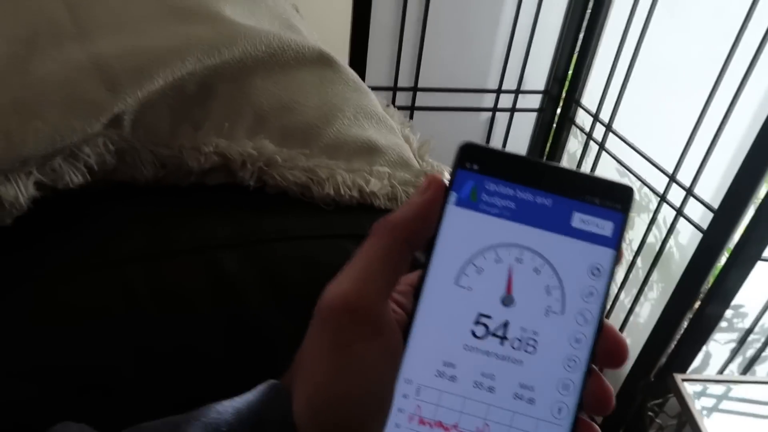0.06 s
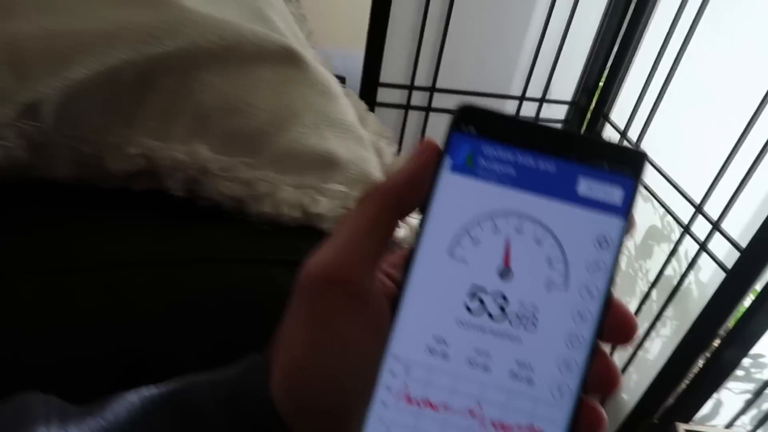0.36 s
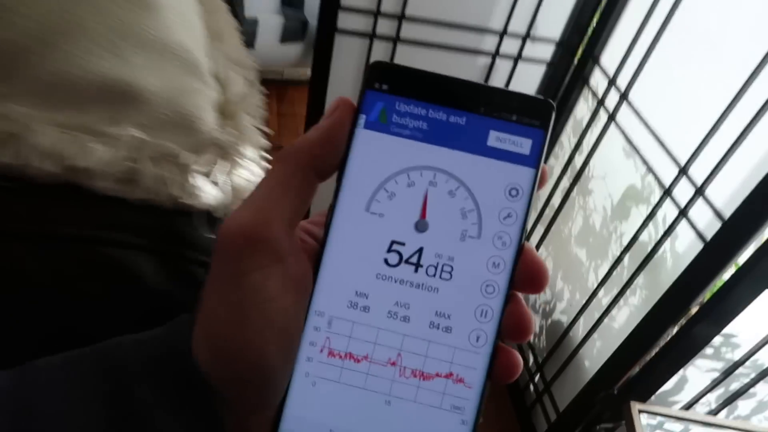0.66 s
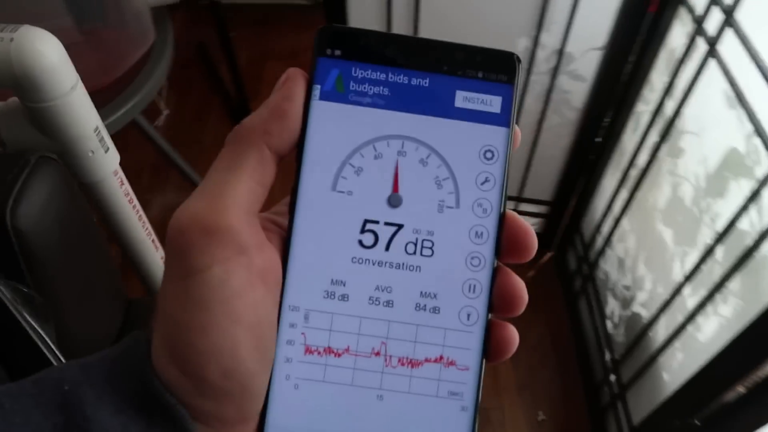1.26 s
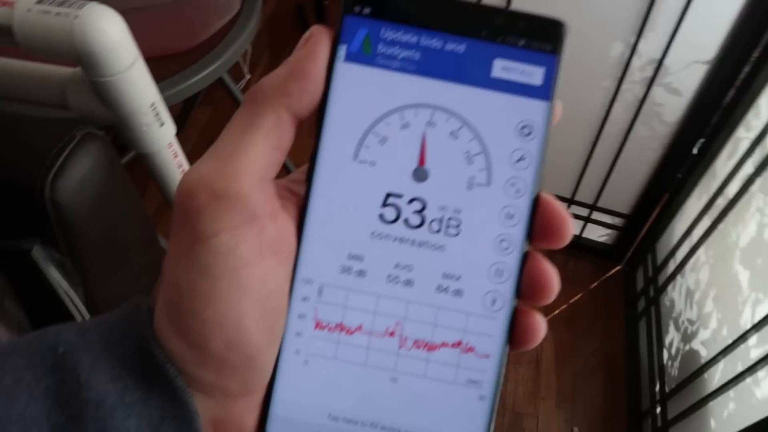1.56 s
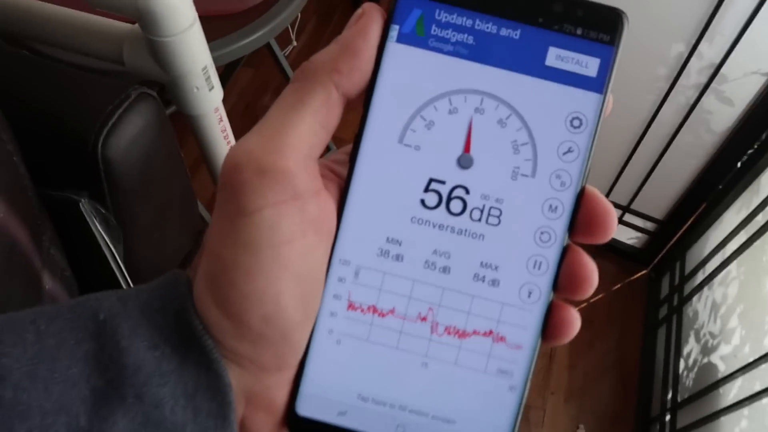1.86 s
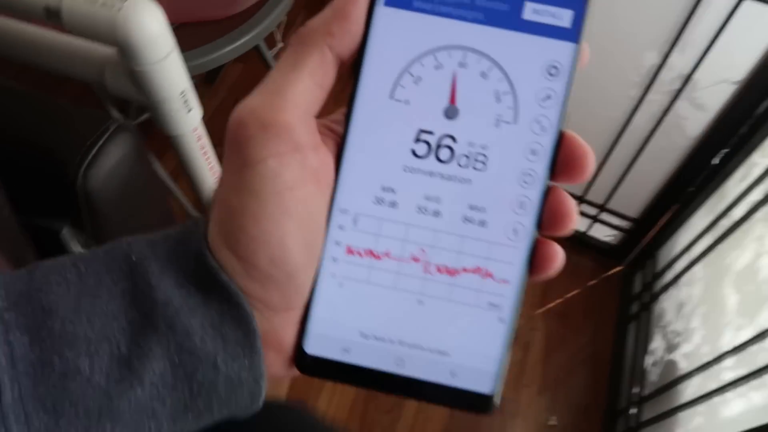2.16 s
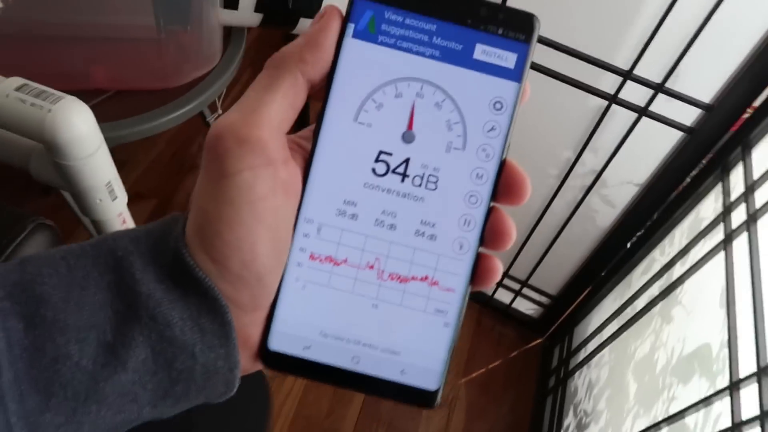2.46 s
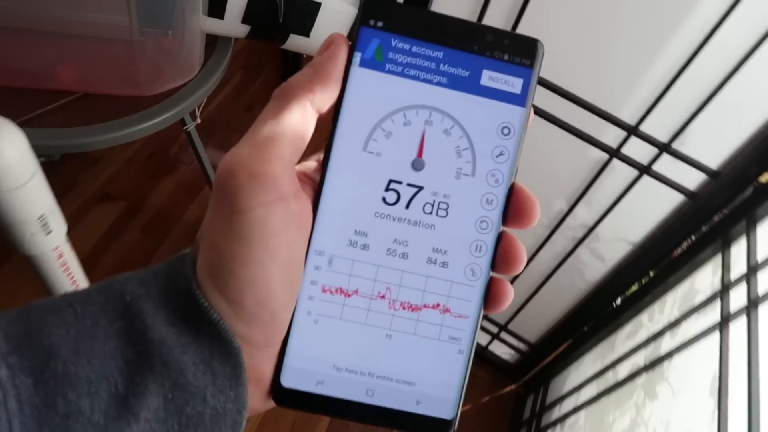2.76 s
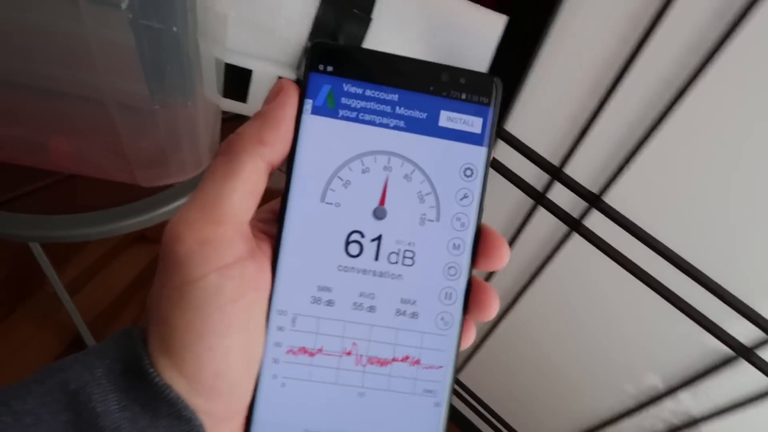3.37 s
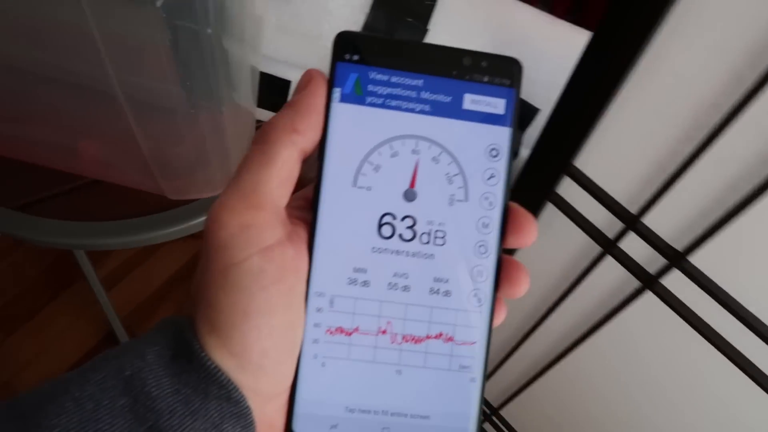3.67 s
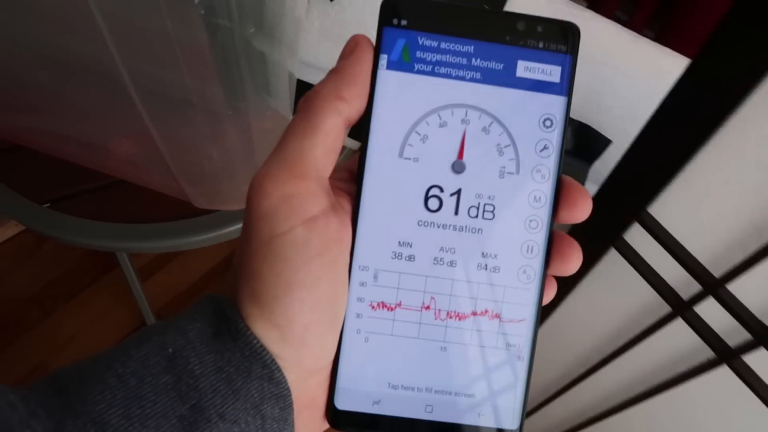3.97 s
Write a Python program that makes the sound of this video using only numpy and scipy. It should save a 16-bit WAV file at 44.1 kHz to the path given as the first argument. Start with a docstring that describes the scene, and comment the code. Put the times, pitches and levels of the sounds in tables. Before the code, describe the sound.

A high, steady whine of cooling fans fills a room, with an airy rush and low electrical hum beneath. A hand or sleeve lightly brushes the moving microphone twice and bumps it softly in between.

```python
"""A high, steady whine from a machine's cooling fans, over a rush of air and a low electrical hum.
Each fan sings at its blade rate. A hand-held microphone drifts through the room's standing waves,
so each tone swells and fades on its own. A hand or sleeve brushes the microphone twice, and between
the brushes the hand bumps it softly: one thud with two weaker knocks close behind."""
import sys
import numpy as np
from scipy import signal
from scipy.fft import rfft, irfft, next_fast_len
from scipy.io import wavfile
from scipy.ndimage import uniform_filter1d, map_coordinates

SR = 44100
rng = np.random.default_rng(int(sys.argv[2]) if len(sys.argv) > 2 else 0)


def inscribe(sig):
    """Save sig as 16-bit PCM at rate SR to the path in sys.argv[1].

    A 1-D sig is mono; a 2-D sig holds one channel per row.
    Samples are clipped to [-1, 1] before scaling.
    """
    pcm = np.round(np.clip(np.atleast_2d(sig).T, -1, 1) * 32767)
    wavfile.write(sys.argv[1], SR, pcm.astype(np.int16))


N = 176400
TIME_S = np.arange(N) / SR


def amp(db):
    """Decibels to gain."""
    return 10 ** (np.asarray(db) / 20)


def unit_rms(x):
    """Scale to rms 1."""
    return x / np.sqrt(np.mean(x ** 2) + 1e-20)


def eq_gain(points, hz):
    """Gain of an EQ curve drawn through (freq_hz, gain_db) points on a log frequency axis."""
    freq_hz, gain_db = np.transpose(points)
    return amp(np.interp(np.log(hz + 1), np.log(freq_hz + 1), gain_db))


def envelopes(rows):
    """One breakpoint envelope for each column after the time."""
    time_s, *columns = np.transpose(rows)
    return [np.interp(TIME_S, time_s, column) for column in columns]


def wobble(rate_hz):
    """A smooth random modulator, with rate_hz new values a second."""
    return map_coordinates(rng.standard_normal(4096), [TIME_S * rate_hz], mode="wrap")


def filtered(x, response):
    """Shape x with a gain that depends on frequency."""
    size = next_fast_len(N + SR // 2)
    return irfft(rfft(x, size) * response(np.fft.rfftfreq(size, 1 / SR)), size)[..., :N]


def drifting_phase(pitch_hz, drift_hz):
    """Phase of a pitch that wanders slightly."""
    return 2 * np.pi * (np.cumsum(pitch_hz + drift_hz * wobble(3.003)) / SR + rng.random())


def blade_tone(phase, level_db, flutter, side_db):
    """A tone with a share (flutter) shaken by turbulence; reflections make left and right differ."""
    shake = 1 + flutter * (wobble(45) + 1j * wobble(45))
    side = amp(side_db) * (wobble(2.27) + 1j * wobble(2.2)) / np.sqrt(2)
    stereo = np.array([1 + side, 1 - side])
    return np.sqrt(2) * amp(level_db) * np.real(shake * np.exp(1j * phase) * stereo)


# The whine's swells and fades: time_s, level_db
WHINE_LEVEL = [(0,-22),(.3,-21),(.46,-25.5),(.58,-35),(.61,-31),(.655,-33),(.685,-25.5),(.75,-23.7),(.98,-26),(1.1,-23.3),(1.35,-26.5),(1.49,-21.7),(1.9,-23),(2.21,-20.1),(2.38,-24.3),(2.54,-23),(2.89,-25.6),(2.97,-22.6),(3.17,-23.3),(3.28,-31),(3.38,-27.3),(3.47,-28),(3.66,-23.4),(3.92,-21.8),(4,-22.4)]
# Its sway as the microphone drifts: time_s, left_minus_right_db
WHINE_PAN = [(0,-1),(.25,0),(.54,-2),(.63,4.2),(.75,.3),(1.02,0),(1.35,4.5),(1.5,1.1),(2.68,-.2),(2.82,1.9),(3.0,.5),(3.26,0),(3.38,-2.2),(4,-1.2)]

def whining_fan():
    """The loudest fan: one nearly pure tone that wavers slightly and sways between the channels."""
    level_db, = envelopes(WHINE_LEVEL)
    pan_db, = envelopes(WHINE_PAN)
    phase = drifting_phase(pitch_hz=1110.2, drift_hz=1.2)
    return blade_tone(phase, level_db, flutter=.085, side_db=-32) * amp([pan_db / 2, -pan_db / 2])


# Swells of the singing fan's first three harmonics, a table each: time_s, level_db
SINGER_FIRST = [(0,-44),(.1,-33),(.2,-35),(.28,-29.7),(.7,-32),(.86,-50),(.93,-49),(1.02,-42.5),(1.13,-43),(1.45,-28.8),(1.7,-28.3),(1.9,-31),(2.4,-30.7),(2.8,-36.5),(3.14,-34.5),(3.24,-43),(3.6,-31),(3.7,-33),(3.85,-29.5),(4,-32)]
SINGER_SECOND = [(0,-53),(.15,-42),(.3,-48),(.54,-39),(.7,-51),(.8,-45),(1.15,-48.5),(1.34,-38.5),(1.52,-41),(1.9,-34.5),(2.25,-34),(2.42,-39),(2.49,-50),(2.59,-42.5),(2.67,-46),(2.85,-38),(3.12,-39),(3.3,-46),(3.52,-35),(3.77,-35.5),(4,-48)]
SINGER_THIRD = [(0,-62),(.25,-58),(.4,-48),(.74,-44),(.83,-56),(1.16,-58),(1.24,-39.5),(1.42,-43),(1.63,-36.8),(1.8,-42),(2.1,-39.7),(2.27,-48),(2.34,-60),(2.41,-43),(2.49,-39),(2.75,-48),(3.12,-43),(3.4,-58),(3.55,-49),(4,-46)]
# Its faint top end: harmonic_number, level_db
SINGER_TOP = [(4, -57), (5, -60), (6, -69)]

def singing_fan():
    """A fan of very steady pitch with a row of harmonics, each fading in its own standing wave."""
    phase = drifting_phase(pitch_hz=797.4, drift_hz=.3)
    flutter, lean_right = .14, amp([[-1.5], [1.5]])
    first = blade_tone(phase, *envelopes(SINGER_FIRST), flutter, side_db=-35)
    second = blade_tone(2 * phase, *envelopes(SINGER_SECOND), flutter, side_db=-15)
    third = blade_tone(3 * phase, *envelopes(SINGER_THIRD), flutter, side_db=-8) * lean_right
    top = sum(blade_tone(harmonic * phase, level_db + 2 * wobble(4.2), flutter, side_db=-7.5)
              for harmonic, level_db in SINGER_TOP)
    return first + second + third + top


# The drone's swells and fades: time_s, level_db
DRONE_LEVEL = [(0, -35.5), (.5, -33), (.8, -38), (1.4, -41.5), (2.2, -42.5), (2.55, -31.5), (3.05, -45),
               (3.5, -38.5), (3.87, -33), (4, -44)]

def droning_fan():
    """A lower, rougher fan whose speed is less steady."""
    level_db, = envelopes(DRONE_LEVEL)
    phase = drifting_phase(pitch_hz=539.3, drift_hz=1.38)
    return blade_tone(phase, level_db, flutter=.5, side_db=-19)


# Pitches of the quiet tones, low to high: pitch_hz
QUIET_PITCHES = [616.3, 870.2, 1079]
# Their swells and fades: time_s, low_fan_db, middle_fan_db, whine_companion_db
QUIET_LEVELS = [(0,-47,-50,-51),(.45,-50,-46,-54),(.7,-53,-42,-43),(1.1,-52,-43,-39.5),(1.75,-45.5,-44,-43),(2.15,-43.5,-55,-48),(2.45,-43,-44,-50),(3,-42,-48,-39),(3.45,-48,-38.5,-36),(4,-57,-44,-41)]

def quiet_tones():
    """Two fans in the background, and a faint tone just below the whine that beats against it."""
    return sum(blade_tone(drifting_phase(pitch_hz, drift_hz=.31), level_db, flutter=.18, side_db=-26.5)
               for pitch_hz, level_db in zip(QUIET_PITCHES, envelopes(QUIET_LEVELS)))


# Thin tones of the case: pitch_hz, level_db
CASE_TONES = [(648, -50), (2699, -64)]

def case_tones():
    """The machine's case sings two weak tones that gently come and go."""
    out = np.zeros((2, N))
    for pitch_hz, level_db in CASE_TONES:
        phase = drifting_phase(pitch_hz, drift_hz=.99)
        out += blade_tone(phase, level_db + 2 * wobble(1.5), flutter=.11, side_db=-29.5)
    return out


def electrical_hum():
    """A low, barely wavering sine, dead centre."""
    level_db = -34 + .4 * wobble(5.3)
    return np.sqrt(2) * amp(level_db) * np.sin(drifting_phase(pitch_hz=59.2, drift_hz=.098))


def eddies(depth_db):
    """Turbulence: two white noises with slow, shallow patches of gain across pitch and time."""
    spectrogram = signal.stft(rng.standard_normal((2, N)), nperseg=1024)[2]
    patches = uniform_filter1d(rng.standard_normal(spectrogram.shape[1:]), size=9, axis=0)
    patches = uniform_filter1d(patches, size=24, axis=1)
    return signal.istft(spectrogram * amp(depth_db * unit_rms(patches)), nperseg=1024)[1][:, :N]


# Colour of the air, with the case's broad resonances in the low mids: freq_hz, gain_db
AIR_EQ = [(12,-18),(22,-12),(30,-11),(39,-11.5),(50,-16),(75,-9.5),(105,-11),(140,-7),(175,0.5),(200,-3),(229,2.5),(252,2),(280,0.5),(400,-2),(470,-1.5),(600,-11),(800,-8.5),(1000,-9),(1180,-8),(1450,-10.5),(1900,-15.5),(2600,-18.5),(3500,-23),(5000,-27.5),(7000,-33),(8500,-39.5),(12000,-41),(14500,-57)]
# Its stereo width: freq_hz, side_minus_mid_db
AIR_WIDTH = [(60,-48.5),(130,-49.5),(250,-35.5),(700,-16.5),(1400,-15),(2000,-12),(3000,-8),(5000,-4.5),(7000,0.5),(9000,2),(12000,13)]
# Crossovers between its six bands: freq_hz
AIR_CROSSOVERS = [195, 380, 720, 1750, 7500]
# Fader rides on the bands: time_s, bass_db, body_db, low_mid_db, mid_db, treble_db, hiss_db
AIR_FADERS = [(0,-28,-26.5,-25,-29.5,-26.5,-24),(.6,-29,-27.5,-26,-29.5,-26.5,-25.5),(1.2,-25.5,-25.5,-27,-27,-25,-25),(1.8,-27,-26.5,-30,-27.5,-25.5,-25),(2.5,-26,-28,-25.5,-27,-25.5,-25.5),(3.15,-25,-24,-27,-27,-25,-24.5),(3.6,-27,-24,-23.5,-26,-26,-20.5),(4,-21.5,-25,-31.5,-25.5,-26,-20.5)]

def rushing_air():
    """Turbulent air, mono in the bass and wide on top; it grows as the microphone comes closer."""
    def mid_side_eq(hz):
        width = eq_gain(AIR_WIDTH, hz)
        return eq_gain(AIR_EQ, hz) * np.array([np.ones_like(hz), width]) / np.hypot(1, width)
    mid, side = unit_rms(filtered(eddies(depth_db=1.44), mid_side_eq)) / np.sqrt(2)
    rush = np.array([mid + side, mid - side])
    lowpassed = [filtered(rush, lambda hz: 1 / (1 + (hz / cut_hz) ** 8)) for cut_hz in AIR_CROSSOVERS]
    *lower, treble, hiss = np.diff([0 * rush, *lowpassed, rush], axis=0)
    bands = *lower, treble * amp([[-.5], [.5]]), hiss  # the treble leans right
    return sum(band * amp(db + .31 * wobble(5.91)) for band, db in zip(bands, envelopes(AIR_FADERS)))


# Colours of the soft swish and of the housing's ring under a scrape: freq_hz, gain_db
SWISH_EQ = [(500, -17), (2000, -9), (4000, -0.5), (6000, -4), (12000, -13.5), (15000, -20.5)]
SCRAPE_EQ = [(1500, -40), (3000, -12), (3350, -1), (3750, 0), (4200, -12), (8000, -40)]
# Brush cues: peak_s, half_length_s, swish_db, scrape_db
BRUSH_CUES = [(0.245, 0.055, -48, -49), (2.47, 0.03, -51, -41.5)]

def sleeve_brushes():
    """Two light brushes of the hand or sleeve: a soft swish, and a scrape that rings the housing."""
    out = np.zeros((2, N))
    for layer, eq in enumerate([SWISH_EQ, SCRAPE_EQ]):
        rub = unit_rms(filtered(rng.standard_normal((2, N)), lambda hz: eq_gain(eq, hz)))
        for peak_s, half_length_s, *levels_db in BRUSH_CUES:
            swell = np.exp(-((TIME_S - peak_s) / half_length_s) ** 2)
            out += amp(levels_db[layer]) * swell * rub
    return out


# Colour of the housing's rumble under a bump: freq_hz, gain_db
RUMBLE_EQ = [(20, -12), (45, -3), (100, -8), (165, 0), (260, -24), (600, -70), (1500, -120)]
# Bump cues: peak_s, level_db, half_length_s
BUMP_CUES = [(1.838, -20, 0.0098), (1.889, -26.5, 0.011), (1.943, -29.5, 0.011)]

def hand_bumps():
    """Each bump of the hand is one push with its rebound, in a short loose rumble of the housing."""
    rumble_vs_push_db, rumble_half_length_s = -10, .022
    rumble = unit_rms(filtered(rng.standard_normal(N), lambda hz: eq_gain(RUMBLE_EQ, hz)))
    out = np.zeros(N)
    for peak_s, level_db, half_length_s in BUMP_CUES:
        from_peak_s = TIME_S - peak_s
        falloff = (from_peak_s / half_length_s) ** 2
        push = (1 - 2 * falloff) * np.exp(-falloff)
        rumble_swell = np.exp(-(from_peak_s / rumble_half_length_s) ** 2)
        out += amp(level_db) * (push + amp(rumble_vs_push_db) * rumble_swell * rumble)
    return out


def scene():
    """The machine's bed of fans, hum and air, with handling noise on top."""
    fans = whining_fan() + singing_fan() + droning_fan() + quiet_tones()
    bed = fans + case_tones() + electrical_hum() + rushing_air()
    return bed + hand_bumps() + sleeve_brushes()


def record(dry):
    """A quick fade at each end and a brick-wall cut of the highest treble."""
    fade_s, cutoff_hz = .004, 14600
    fade = np.clip(np.minimum(TIME_S, TIME_S[::-1]) / fade_s, 0, 1)
    return filtered(dry * fade, lambda hz: hz < cutoff_hz)


dry = scene()
out = record(dry)
inscribe(out)
```